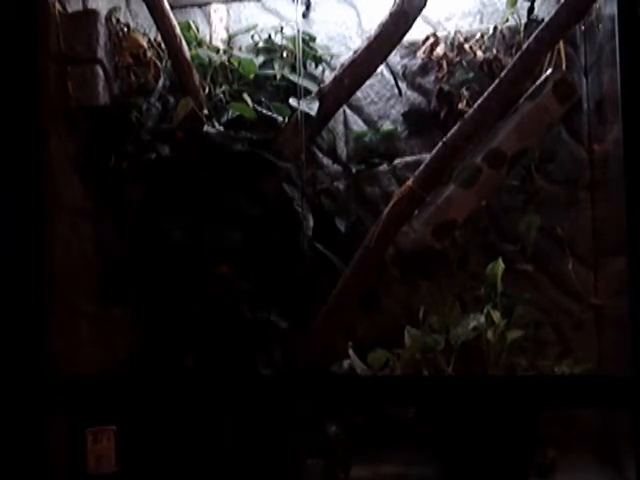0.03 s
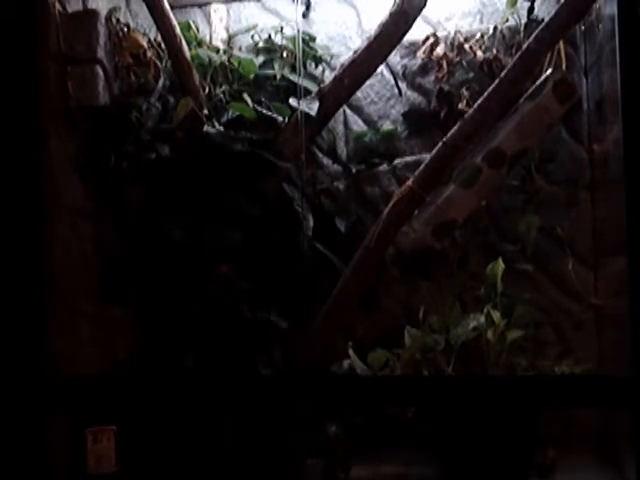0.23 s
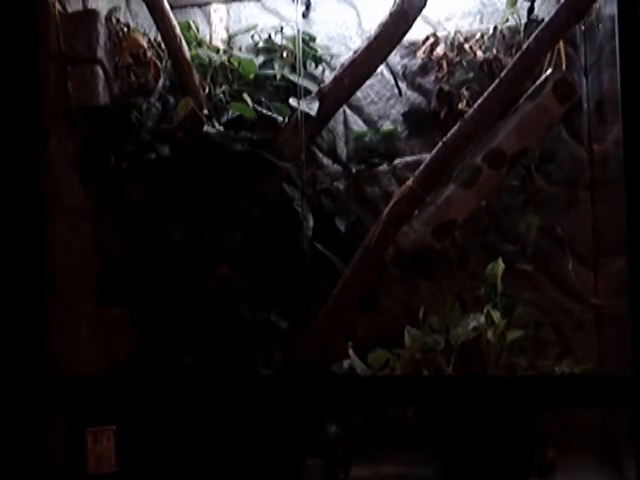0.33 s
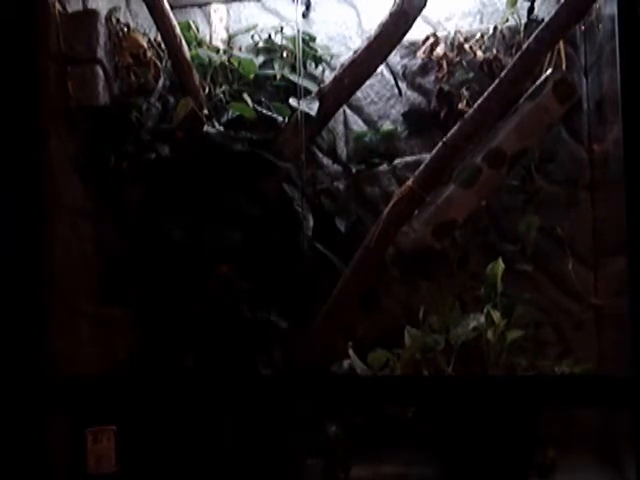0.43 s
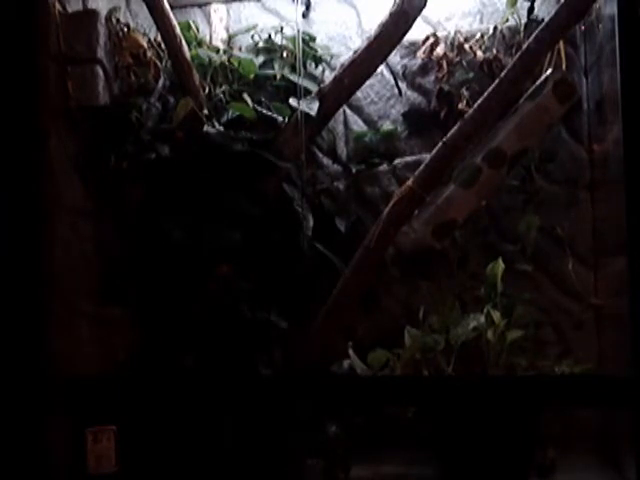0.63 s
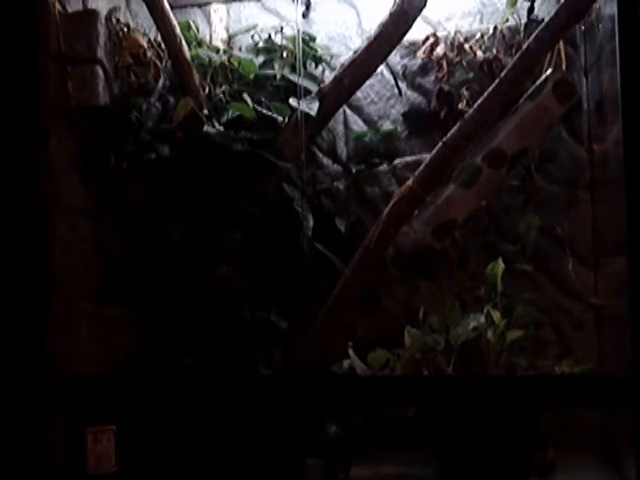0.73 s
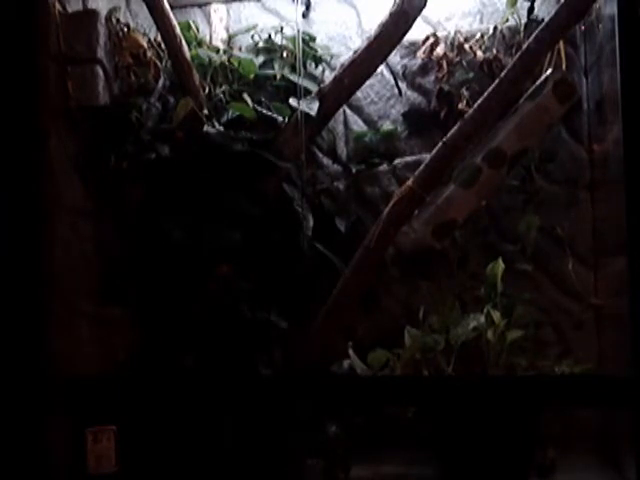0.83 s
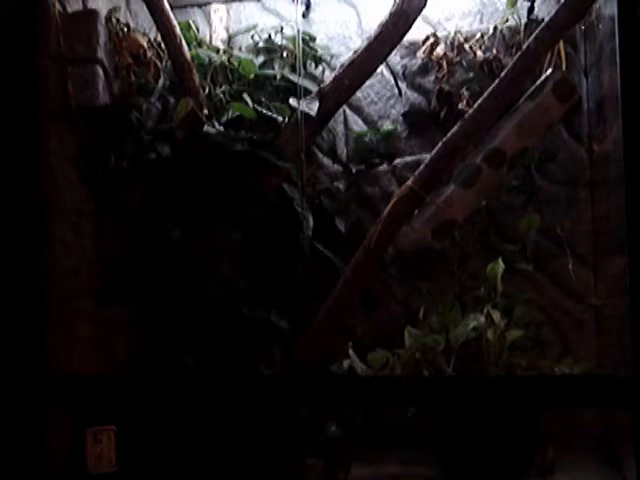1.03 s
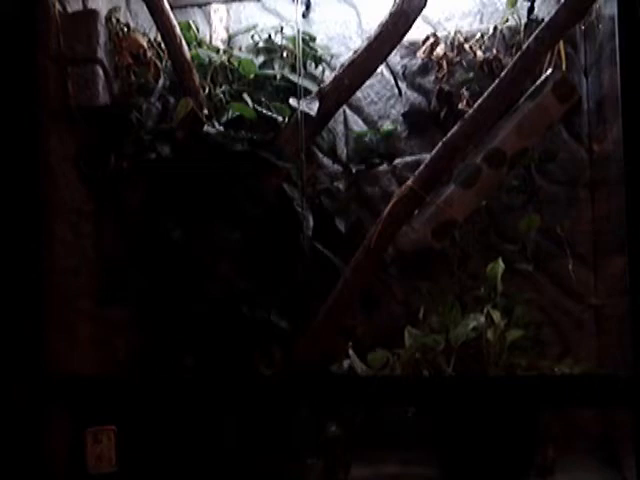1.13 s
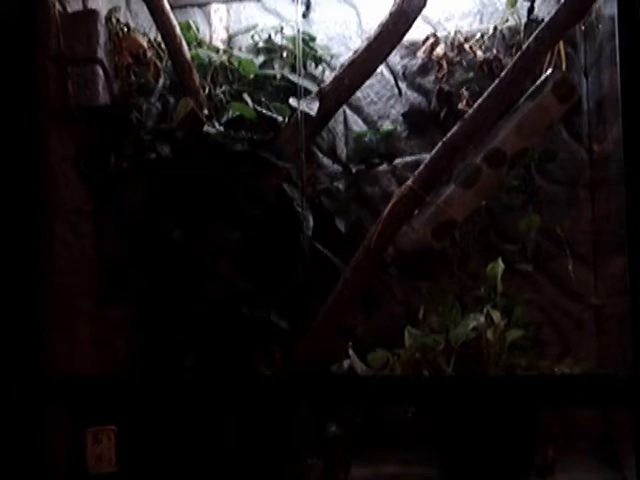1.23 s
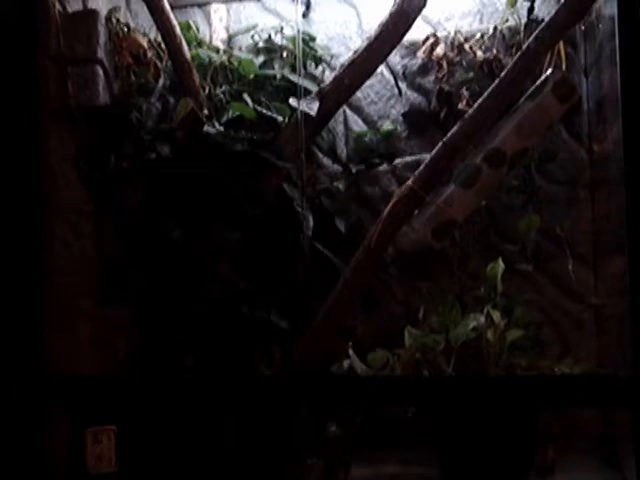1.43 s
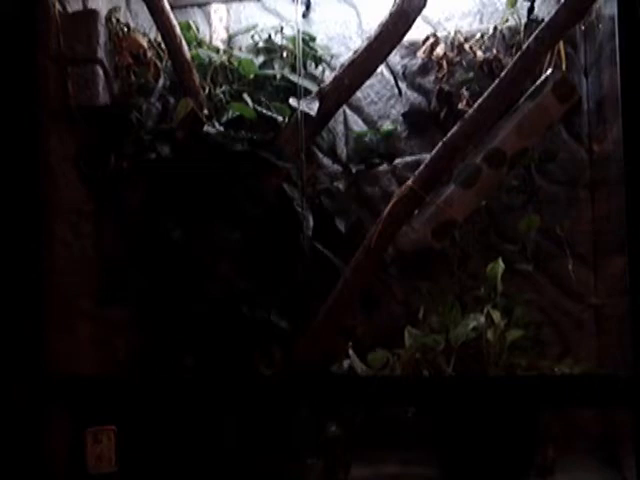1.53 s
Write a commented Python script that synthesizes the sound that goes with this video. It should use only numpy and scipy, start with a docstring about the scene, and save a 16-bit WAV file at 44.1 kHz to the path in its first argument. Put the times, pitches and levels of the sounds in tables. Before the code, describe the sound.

A gecko in a glass tank gives one short, high bark, then a louder, longer croak that drops into a slow, rough creak. A high cricket trill flutters throughout over quiet room hush; close, boxy indoor pickup.

```python
"""From the start, crickets trill near 5 kHz over the hush of a room at night and a thin electric whine.
After 0.2 s a gecko in a glass tank barks, short and high, then gives a longer croak that sinks into a creak.
The trill is short tones over blurred noise, the hush is shaped noise and the whine a steady sine.
The voice is uneven pulses and puffs of air through two throat filters; the tank and then the room ring with it."""
import sys
import numpy as np
from scipy import signal
from scipy.fft import rfft, irfft
from scipy.io import wavfile
from scipy.ndimage import uniform_filter1d

SR = 44100
rng = np.random.default_rng(int(sys.argv[2]) if len(sys.argv) > 2 else 0)


def boost_factor(decibels):
    """Convert a level in decibels to a linear amplitude factor."""
    exponent = np.asarray(decibels, float) / 20
    return 10 ** exponent


def waveform_to_disk(signal):
    """Save audio, clipped to [-1, 1], as 16-bit WAV at the path in sys.argv[1]."""
    frames = np.transpose(np.atleast_2d(signal))
    scaled = np.clip(frames, -1, 1) * 32767
    samples = np.round(scaled).astype(np.int16)
    wavfile.write(sys.argv[1], SR, samples)


N = 70560  # samples, 1.6 s

# steady electric whine: f/Hz, rms level/dB
WHINE_TONES = [(7862, -65.5)]
# spectral shape of the hush: f/Hz, relative level per Hz/dB
HUSH_SPECTRUM = [(20, -17.5), (60, -3.5), (110, -16.5), (160, 1), (300, -6), (500, 3.5), (750, -5.5),
                 (1200, -4.5), (2000, -8.5), (3500, -12.5), (6000, -13.5), (7500, -16), (9800, -18.5)]
# likeness of left and right in the hush: f/Hz, correlation/0-1
HUSH_LIKENESS = [(60, 0.92), (250, 1), (1000, 0.98), (5000, 1), (9000, 0.95)]
HUSH_DB, PATCH_DB = -49, 3.0  # rms level, rms depth of the drifting patches

# cricket trill: t/s, rms level/dB, centre f/Hz
TRILL_TRACK = [(0.0, -40, 4920), (0.034, -37, 4790), (0.302, -46, 4860), (0.316, -34, 4800),
               (0.356, -43, 4780), (0.368, -30.5, 4860), (0.476, -34, 5050), (0.484, -50, 4990),
               (0.498, -43, 4960), (0.508, -44, 4950), (0.68, -40.5, 4880), (0.69, -38.5, 4706),
               (0.748, -41.5, 4660), (0.766, -34, 4620), (0.796, -38, 4844), (0.81, -34.5, 4870),
               (0.934, -44.5, 4910), (1.002, -33.5, 4730), (1.028, -42, 4702), (1.038, -33, 4660),
               (1.078, -37.5, 4810), (1.184, -38, 4787), (1.202, -51, 4850), (1.212, -33.5, 5072),
               (1.238, -46, 5107), (1.252, -28, 5110), (1.292, -40, 5010), (1.328, -31.5, 5016),
               (1.35, -41, 4720), (1.38, -39.5, 4916), (1.39, -33, 5035), (1.416, -38.5, 4810),
               (1.542, -39, 4910), (1.6, -46.5, 5004)]
SPREAD_HZ, BLUR_WIDTH_HZ = 330, 470  # pitches to either side of the centre, width of each blur filter
STROKES_PER_S, STROKE_S, STROKE_DB = 130, 0.013, 2  # average rate, length, scale of the random boost
BLUR_SHARE = 0.57  # far crickets against near ones, 0-1
TRILL_PAN_DB = -1  # left minus right

# bark: t/s, pulse f/Hz, low throat level/dB, high throat level/dB, roughness/0-1
BARK_TRACK = [(.198, 454, -43, -45.5, 0.7), (.201, 430.4, -21.5, -15, 0.53),
              (.215, 419, -22.5, -14.5, 0.15), (.235, 416.3, -27.5, -20, 0.07),
              (.246, 410.2, -20.5, -22, 0.24), (.295, 413.9, -26.5, -29.5, 0.13),
              (.32, 409.8, -40.5, -43.5, 0.33), (.36, 416.2, -57.5, -46, 0.25),
              (.42, 409.3, -64.5, -48, 0.3), (.428, 436, -80, -87.5, 0)]
# croak sinking into a creak: t/s, pulse f/Hz, low throat level/dB, high throat level/dB, roughness/0-1
CROAK_TRACK = [(.447, 293.3, -46.5, -48.5, 0.46), (0.451, 290.9, -17, -16.5, 0.43),
               (0.471, 271.3, -15, -18.5, .06), (0.513, 270.1, -17.5, -21.5, 0.023),
               (.53, 254.3, -18.5, -20.5, .15), (.555, 244.4, -24.5, -23.5, 0.44),
               (.58, 124.8, -22, -27.5, 0.706), (.65, 67.92, -26.5, -30.5, 0.63),
               (.75, 64.99, -32.5, -36.5, 0.84), (.86, 62.56, -37.5, -40, .8),
               (0.949, 62.35, -41, -45, 0.85), (1.014, 61, -52.5, -56.5, 0.81),
               (1.034, 59.6, -56, -68, 0.72), (1.09, 60, -72, -82, 1)]
# shape of the low throat resonance: f/Hz, relative level/dB
LOW_THROAT_SHAPE = [(100, -53.5), (200, -47), (300, -17), (400, -5.5), (520, 7), (650, -2.5), (850, -8.5),
                    (1150, -25), (1400, -32.5), (3000, -62)]
# shape of the high throat resonance: f/Hz, relative level/dB
HIGH_THROAT_SHAPE = [(900, -41.5), (1400, -14.5), (1620, -7), (1850, -21.5), (2100, 4), (2400, -2),
                     (2950, -20), (3500, -28), (4100, -34), (5000, -42), (6800, -47), (8000, -58),
                     (15000, -62.5)]
JITTER, SHIMMER_DB, PUFF = 0.22, 9, 0.6  # at full roughness: timing/periods, pulse size, air noise
CREAK_BELOW_HZ, WEAK_DB = 180, -5.5  # every second creak pulse is weaker

# ringing air modes of the tank: f/Hz, relative level/dB, time to fall by 57 dB/s
TANK_MODES = [(388.8, 3.5, 0.36), (484.5, 3, 0.31), (519, 0, 0.15), (593.7, 4, 0.26), (712, -4.5, 0.15),
              (815.6, -1, 0.055), (1126, 2.5, 0.035), (1600, 4.5, .14), (1991, -3.5, 0.3),
              (2082.8, 4.5, 0.17), (2193, -1, 0.13), (2236, 1, 0.097), (2336, 4, 0.1), (2456, 5.5, 0.11)]
# first echoes off the glass: delay t/s, level/dB
GLASS_ECHOES = [(.0011, -4), (.0023, -1.5), (.0031, -5.5), (.0046, -4), (.0062, -8.5), (.0083, -9.5),
                (.011, -9.5)]
# stereo lean of the direct voice: f/Hz, left minus right level/dB
VOICE_LEAN = [(300, -1.9), (800, 0.56), (1300, -2.16), (3000, -1.5), (6000, -7)]
TANK_DB, ROOM_DB, ROOM_T60_S = 8.5, -3.5, 0.17


def evened(x):
    """Brings a sound to an rms of one."""
    return x / np.sqrt(np.mean(x ** 2) + 1e-20)


def read(points, hz):
    """Reads a curve along a logarithmic frequency axis."""
    f, value = np.transpose(points)
    return np.interp(np.log(hz + 1), np.log(f + 1), value)


def add(mix, s, sound):
    """Lays a sound into the mix from time s in seconds."""
    part = mix[round(s * SR):][:len(sound)]
    part += sound[:len(part)]


def colour(x, points):
    """Causal minimum-phase filter with the given spectrum, so that nothing sounds ahead of its pulse."""
    half = read(points, np.fft.rfftfreq(8192, 1 / SR)) * np.log(10) / 20
    log_gain = np.concatenate([half, half[-2:0:-1]])
    taps = np.fft.ifft(np.exp(np.conj(signal.hilbert(log_gain)))).real[:2048]
    return signal.oaconvolve(x, taps)[:len(x)]


def resonate(x, hz, width):
    """A resonance that may glide: shifts the frequency hz down to zero, smooths, and shifts back."""
    turn = np.exp(2j * np.pi * np.cumsum(hz * np.ones(len(x))) / SR)
    r = np.exp(-np.pi * width / SR)
    smooth = signal.lfilter([1 - r], [1, -r], x / turn + 1e-18)
    return 2 * (turn * smooth).real


def whine():
    """A thin electric whine: a steady sine."""
    t = np.arange(N) / SR
    return sum(np.sqrt(2) * boost_factor(db) * np.sin(2 * np.pi * f * t) for f, db in WHINE_TONES)


def hush():
    """Room and microphone noise, partly shared by the two sides, with patches drifting in time and pitch."""
    frames, hz = N // 256 + 5, np.fft.rfftfreq(1024, 1 / SR)
    a, b, c, d, patches = rng.standard_normal((frames, 513, 5)).T
    patches = uniform_filter1d(patches, 12, 0)  # over frequency
    patches = evened(uniform_filter1d(patches, 14, 1))  # over time
    same = np.clip(read(HUSH_LIKENESS, hz), -1, 1)[:, None]
    left, other = a + 1j * b, c + 1j * d
    z = np.array([left, same * left + np.sqrt(1 - same ** 2) * other])
    z *= boost_factor(read(HUSH_SPECTRUM, hz)[:, None] + PATCH_DB * patches)
    noise = signal.istft(z, nperseg=1024, noverlap=768)[1][:, :N]
    return boost_factor(HUSH_DB) * evened(noise)


def crickets():
    """Wing strokes of several crickets, each a short tone near the chorus centre, over a blur of far ones."""
    s, db, hz = np.transpose(TRILL_TRACK)
    t = np.arange(N) / SR
    centre = np.interp(t, s, hz)
    stroke = np.hanning(round(STROKE_S * SR) + 3)
    near = np.zeros(N)
    for off in np.linspace(-1, 1, 5):
        starts = rng.random(N) < STROKES_PER_S / 5 / SR
        size = starts * boost_factor(STROKE_DB * np.minimum(rng.exponential(1, N), 4))
        phase = 2 * np.pi * (np.cumsum(centre + off * SPREAD_HZ) / SR + rng.random())
        near += signal.oaconvolve(size, stroke)[:N] * np.sin(phase)
    far = resonate(rng.standard_normal(N), centre, BLUR_WIDTH_HZ)
    far = resonate(far, centre, BLUR_WIDTH_HZ)
    trill = evened((1 - BLUR_SHARE) * evened(near) + BLUR_SHARE * evened(far))
    return boost_factor(np.interp(t, s, db)) * trill * boost_factor([[TRILL_PAN_DB / 2], [-TRILL_PAN_DB / 2]])


def room(x):
    """Sparse echoes of random sign that die away, nearly the same on both sides."""
    t = np.arange(SR // 2) / SR
    shared, left, right = rng.choice([-1., 1.], (3, len(t))) * (rng.random((3, len(t))) < 0.05)
    taps = shared + 0.05 * np.array([left, right])
    taps = taps * boost_factor(-60 * t / ROOM_T60_S) * (t > 0.004)
    return signal.fftconvolve(x[None], taps / np.linalg.norm(taps[0]), axes=1)[:, :N]


def tank(x):
    """The voice, its first echoes off the glass, and the ringing air modes of the tank."""
    ringing = np.zeros(len(x))
    for k, (hz, db, fall_s) in enumerate(TANK_MODES):
        ringing += (-1) ** k * boost_factor(db) * resonate(x, hz, 2.09 / fall_s)
    out = x + boost_factor(TANK_DB) * ringing
    for k, (s, db) in enumerate(GLASS_ECHOES):
        add(out, s, (-1) ** k * boost_factor(db) * x)
    return out


def fold_pulses(hz, rough, turns):
    """Pulses of the vocal folds, one a cycle, uneven in time and size where the voice is rough."""
    cycle = turns.astype(int)
    late, size = rng.standard_normal((400, 2)).T
    at = np.flatnonzero(np.diff(cycle, prepend=-1))
    k, period = cycle[at], SR / hz[at]
    place = at - (turns[at] % 1) * period + JITTER * rough[at] * late[k] * period
    db = SHIMMER_DB * rough[at] * np.clip(size[k], -2, 1.5)
    db = db + WEAK_DB * (k % 2) * (hz[at] < CREAK_BELOW_HZ)
    gain = boost_factor(db) * np.sqrt(period)  # rarer pulses are stronger
    # windowed sinc sets each pulse between samples
    near = np.round(place).astype(int)[:, None] + np.arange(-16, 17)
    kernel = np.sinc(near - place[:, None]) * np.hanning(33) * gain[:, None]
    folds = np.zeros(len(turns))
    np.add.at(folds, np.clip(near, 0, len(turns) - 1), kernel)
    return folds


def call(track):
    """Vocal fold pulses, each cycle with a fading puff of air, through two throat resonances."""
    s, hz, low_db, high_db, rough = np.transpose(track)
    t = np.arange(s[0], s[-1], 1 / SR)
    hz, rough = np.interp(t, s, hz), np.clip(np.interp(t, s, rough), 0, 1)
    turns = np.cumsum(hz) / SR
    puffs = PUFF * rough * rng.standard_normal(len(t)) * np.exp(-(turns % 1) / 1.2)
    drive = fold_pulses(hz, rough, turns) + puffs
    low = boost_factor(np.interp(t, s, low_db)) * evened(colour(drive, LOW_THROAT_SHAPE))
    high = boost_factor(np.interp(t, s, high_db)) * evened(colour(drive, HIGH_THROAT_SHAPE))
    return s[0], low + high


def scene():
    """The gecko in its tank, heard directly and through the room, over crickets, hush and whine."""
    voice = np.zeros(N)
    for track in (BARK_TRACK, CROAK_TRACK):
        add(voice, *call(track))
    voice = tank(voice)
    lean = boost_factor(read(VOICE_LEAN, np.fft.rfftfreq(N, 1 / SR)) / 2)
    direct = irfft(rfft(voice) * np.array([lean, 1 / lean]), N)
    return direct + boost_factor(ROOM_DB) * room(voice) + crickets() + hush() + whine()


def band_limit(x):
    """A steep low-pass at the top of the band."""
    return signal.sosfilt(signal.butter(12, 10100, fs=SR, output="sos"), x)


def record(dry):
    """The input stage rounds off the highest peaks."""
    mix = 0.94 * np.tanh(dry / 1.069)
    return band_limit(mix)


dry = scene()
out = record(dry)
waveform_to_disk(out)
```